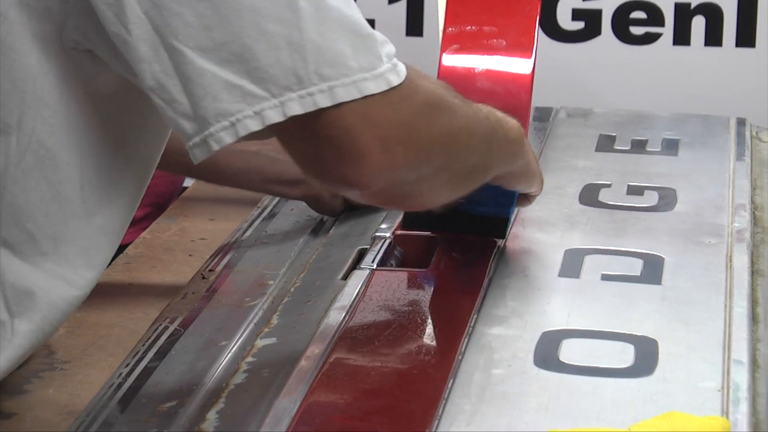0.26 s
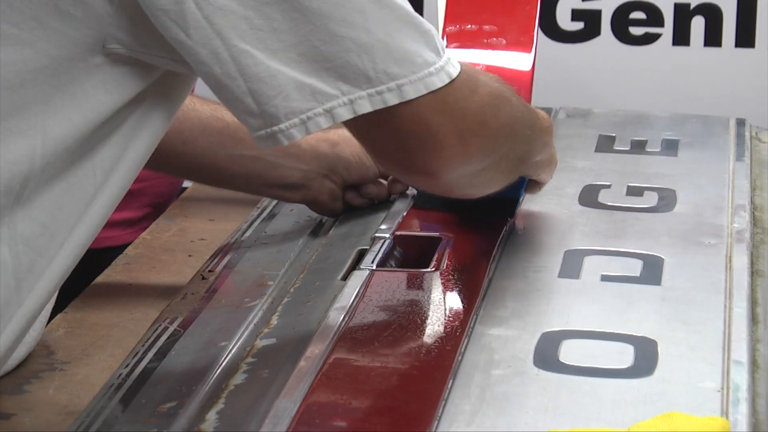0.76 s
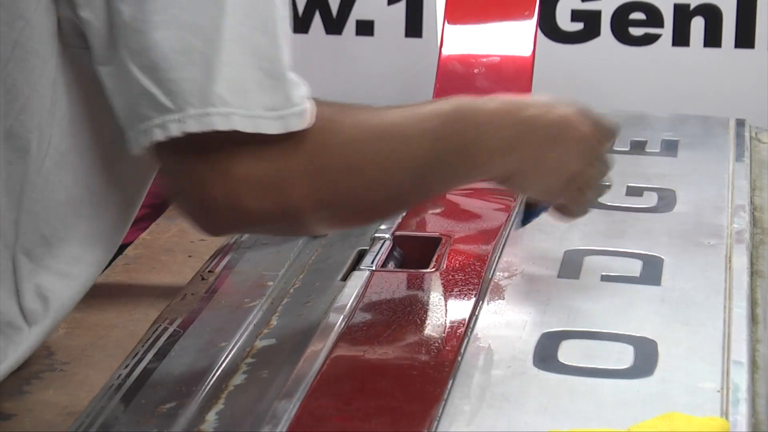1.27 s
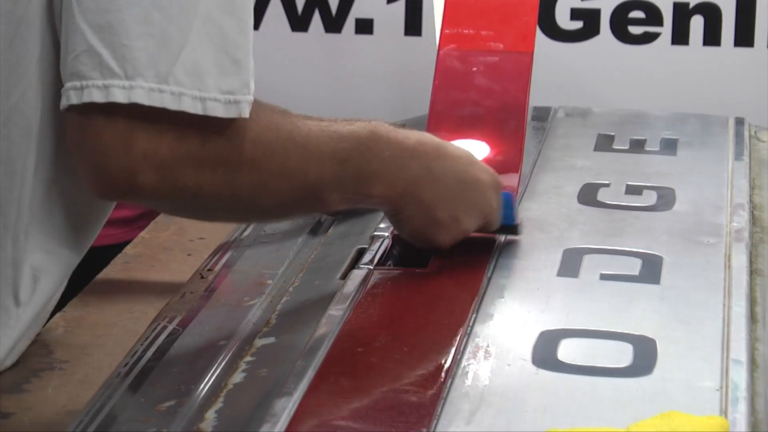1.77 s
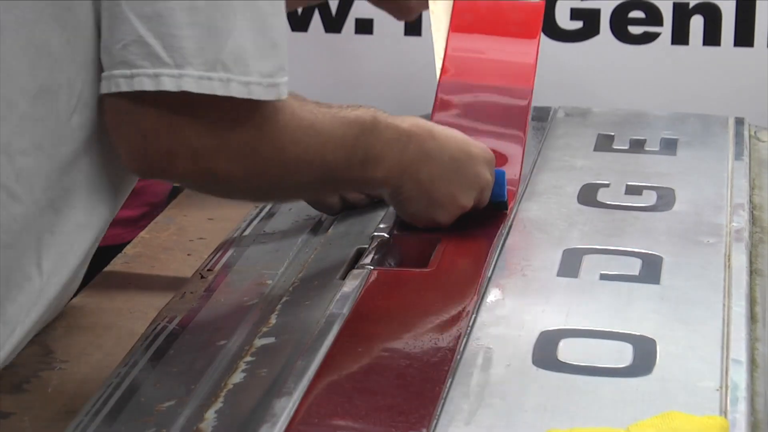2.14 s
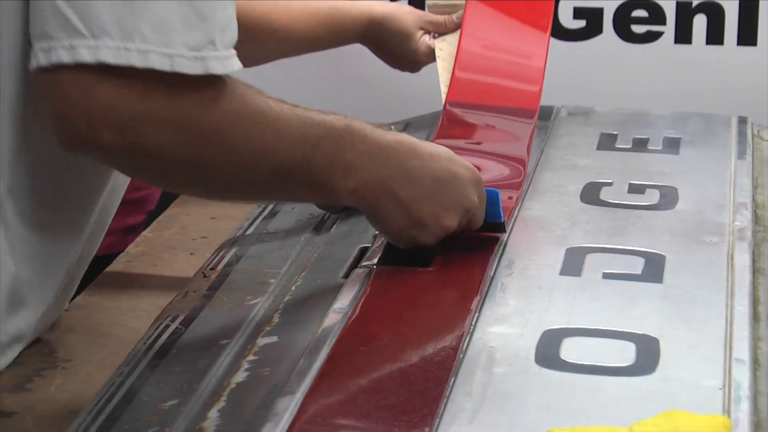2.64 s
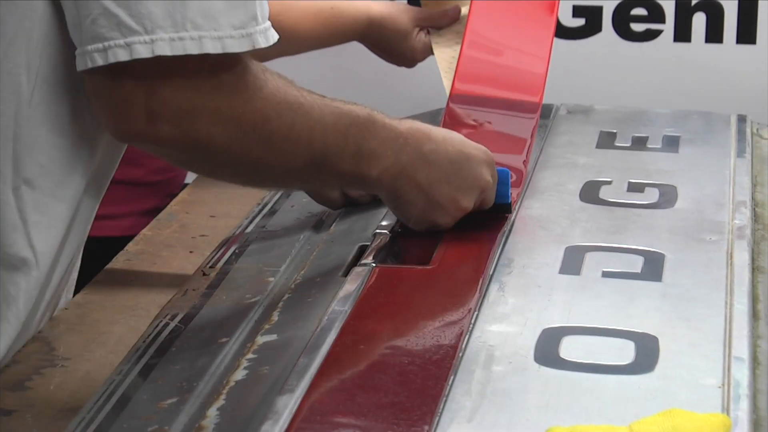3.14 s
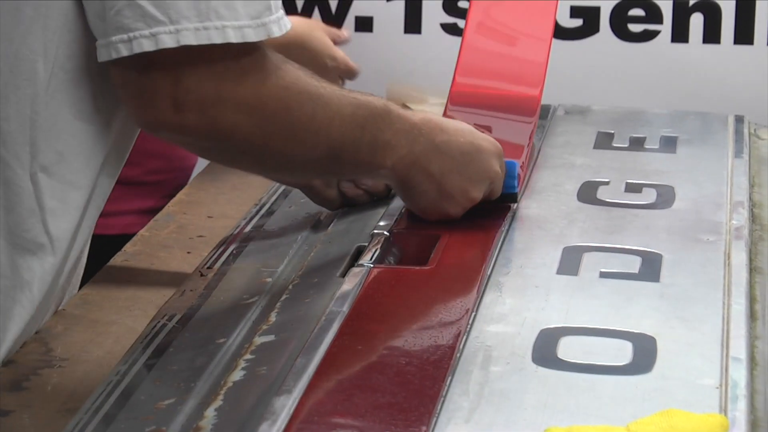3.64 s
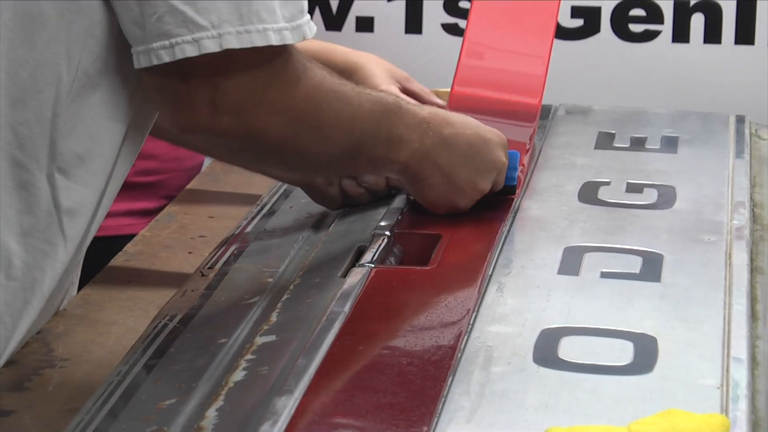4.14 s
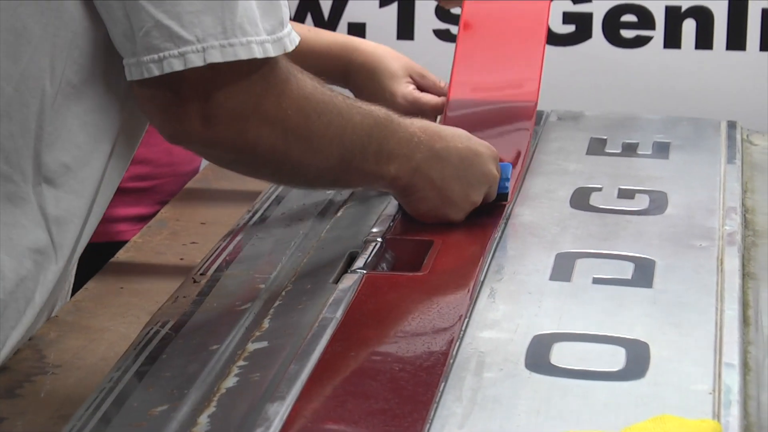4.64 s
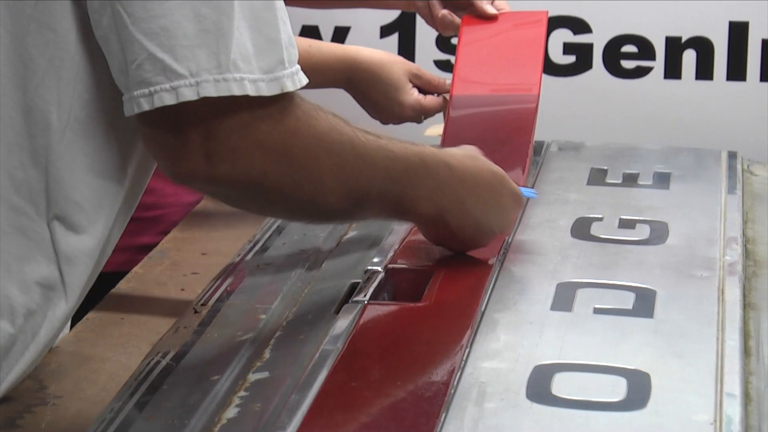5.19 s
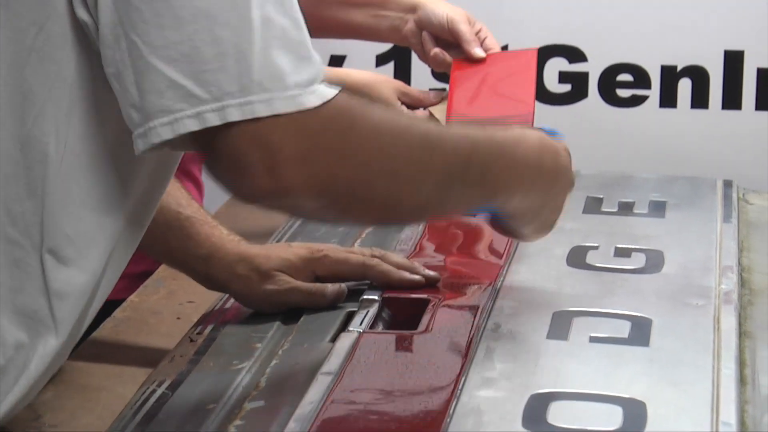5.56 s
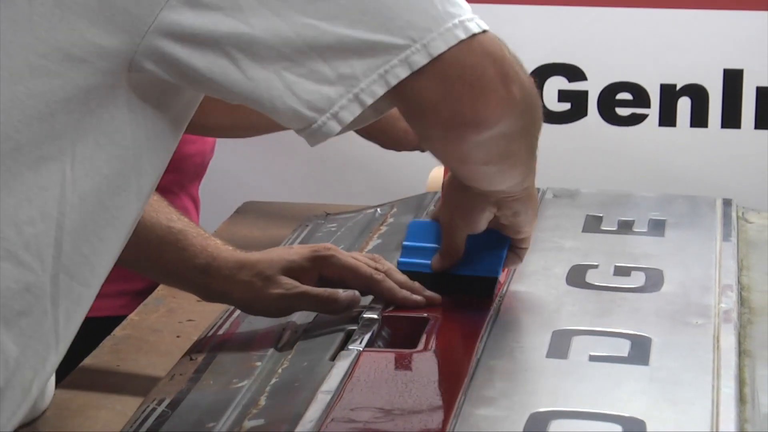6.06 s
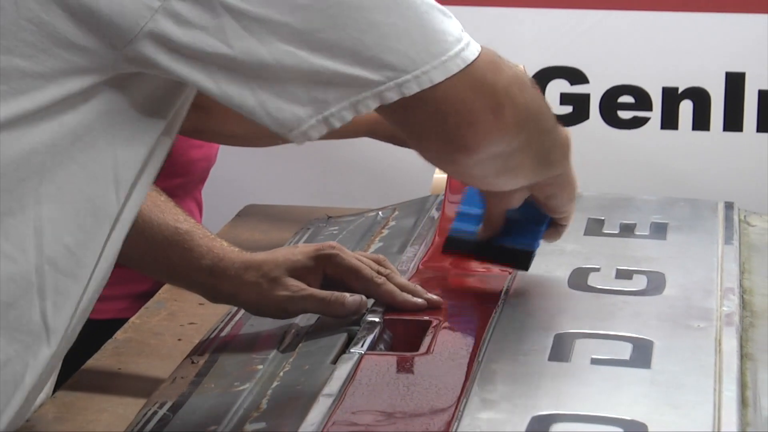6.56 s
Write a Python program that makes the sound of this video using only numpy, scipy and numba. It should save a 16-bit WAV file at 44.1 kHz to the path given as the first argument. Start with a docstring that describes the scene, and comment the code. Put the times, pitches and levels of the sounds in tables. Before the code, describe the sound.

A felt-edged plastic squeegee works wet vinyl onto a hollow metal tailgate, heard up close over low, steady garage air. A dull knock at 0.3 seconds and a faint rub lead to a short, low judder from about 0.7 to 1.1 seconds. Hissing, rasping strokes with soft bumps follow from 1.6 to 3 seconds. From about 3.1 to 3.7 seconds the blade is pressed hard and sticks and slips, drumming the panel loudly with sharp knocks and brief hollow squawks. A second loud judder comes around 4 to 4.3 seconds; the loudest peaks duck and clip slightly. Lighter scraping continues, with a sharp click near 4.9 seconds and a quieter stretch of small ticks. Rubbing returns around 5.7 seconds, with a firm knock at 6, then more uneven swipes, soft bumps and ticks, and a sharp click near 6.8 seconds.

```python
"""Squeegee on a hollow tailgate

A felt-edged plastic squeegee works wet vinyl onto a sheet-metal tailgate on a bench in a garage.
Gliding felt hisses; pressed hard it sticks and slips, drumming the hollow panel. The blade knocks,
clicks and snags over steady room air. A close camera microphone turns its gain down on the loud
strokes and clips their peaks."""
import sys
import numpy as np
from scipy import signal
from scipy.fft import rfft, irfft
from scipy.io import wavfile
from scipy.ndimage import uniform_filter1d
from numba import njit

SR = 44100
rng = np.random.default_rng(int(sys.argv[2]) if len(sys.argv) > 2 else 0)


def to_wav(s):
    """Save 16-bit WAV."""
    ch = np.atleast_2d(s).T  # columns
    pcm = np.round(np.clip(ch, -1, 1) * 32767)  # PCM
    wavfile.write(sys.argv[1], SR, pcm.astype(np.int16))


N = 300762
TIME = np.arange(N) / SR
RING_TIME = TIME[:SR * 3 // 5]  # the 0.6 s that one tap rings for
TOP_HZ = 15900

# tone of felt hissing on wet vinyl: (frequency [Hz], level [dB])
HISS_TONE = [(1500, -33), (3000, 0.5), (4300, 0.5), (5000, 0), (5900, -1.5), (7000, -4), (8300, -2.5),
             (10000, -3), (12500, -5.5), (16000, -9)]


def judders(spots, slip_hz=74, bare_hz=1000, jitter=0.0995, uneven_db=3, rebound_db=-7, crack_db=1.0):
    """Stick-slip: the felt grips and lets go, each slip tapping the panel as the blade creeps along."""
    # hard-pressed strokes: (start [s], hardest push [s], end [s], peak level [dB],
    # swell and fade [dB/s], peak hardness [Hz], low cut [Hz])
    hard_strokes = [(0.722, 0.91, 1.07, -14, 14, 155.1, 115), (2.212, 2.348, 2.35, -15.5, 89, 172, 69.5),
                    (3.099, 3.133, 3.12, -11, 150, 446, 60), (3.372, 3.56, 3.72, -0.5, 69, 1093, 81),
                    (3.965, 4.006, 4.05, -12.5, 150, 172.2, 42), (4.112, 4.148, 4.72, -3, 102, 1152, 65),
                    (6.32, 6.33, 6.726, -29.5, 14, 130, 125)]
    out = np.zeros(N)
    for start, peak, end, peak_db, db_per_s, peak_hz, low_hz in hard_strokes:
        timing, luck, lag = rng.standard_normal((96, 3)).T
        # the bare blade slips slip_hz times a second; a harder grip holds longer
        rate = slip_hz * (bare_hz / peak_hz) ** .3
        times = np.append(0, np.cumsum(np.abs(1 + jitter * timing))) / rate
        length = max(end - start, 1 / rate)
        here, there = (spots[k] for k in rng.permutation(len(spots))[:2])
        cracks = [undb(crack_db) * snap(peak_hz) for _ in range(4)]
        stroke, sizes = np.zeros(int(length * SR) + len(RING_TIME)), []
        for k, s in enumerate(times[times < length]):
            travel = s / length
            eased_db = db_per_s * abs(start + s - peak)
            firmness = .5 ** (eased_db / 13)  # a push 13 dB weaker is half as hard
            sizes.append(undb(peak_db - eased_db))
            spot = (1 - travel) * here + travel * there
            tap = boom(spot, firmness * peak_hz, low_hz) + firmness * cracks[k % len(cracks)]
            slip = sizes[-1] * undb(uneven_db * luck[k]) * tap
            add(stroke, s, slip)
            # a hard edge catches again, more weakly, part way to the next slip
            rebound = undb(rebound_db) * min(firmness * peak_hz / bare_hz, 1)
            add(stroke, s + abs(.5 + 0.151 * lag[k]) / rate, rebound * slip)
        # overlapping rings pile up, so the stroke as a whole is brought to its level
        piled_power = np.mean(stroke[:int(length * SR)] ** 2)
        add(out, start, stroke * np.sqrt(np.mean(np.square(sizes)) / piled_power))
    return out


def knocks_and_slips(spots, snap_db=-3):
    """Knocks and the loudest slips boom in the hollow panel, the hard ones with a snap on top."""
    # knocks of blade and hand, and the loudest slips of the juddering blade:
    # (time [s], level [dB], hardness [Hz], low cut [Hz])
    jolts = [(.290, -16.5, 284, 200), (.973, -14.5, 181, 59.5), (1.05, -18, 830, 165),
             (1.602, -27, 230, 101.4), (1.888, -24.5, 287, 104), (2.314, -13, 850, 110),
             (2.335, -10, 180, 50), (2.730, -14, 346, 222), (3.092, -10, 1440, 69.6),
             (3.222, -6, 2220, 69.5), (3.339, -3.5, 2550, 100), (3.359, -8, 2070, 98),
             (3.439, -9, 1800, 61.8), (3.486, -5, 2200, 102), (3.506, -6, 2180, 148),
             (3.940, -10.5, 1130, 100), (3.953, -10.5, 1310, 70), (4.099, -5.5, 2030, 60),
             (4.201, -8.5, 2170, 100), (4.241, -11, 1480, 189), (4.484, -19, 1100, 105),
             (5.511, -22.5, 240, 108), (5.987, -6, 950, 233), (6.141, -23, 344, 128),
             (6.301, -20.5, 185, 111), (6.579, -17, 271.3, 125)]
    # each jolt touches, lands, then settles: (delay [s], level offset [dB], share of hardness [ratio])
    touches = [(-.008, -13.5, .8), (0, 0.5, 1), (.03, -10.5, .6)]
    out = np.zeros(N)
    for s, db, hz, low_hz in jolts:
        for delay, offset_db, share in touches:
            spot = spots[rng.integers(len(spots))]
            tap = boom(spot, share * hz, low_hz) + undb(snap_db) * snap(share * hz)
            add(out, s + delay, undb(db + offset_db) * tap)
    return out


def panel_spots(count=8, spread_db=5.0, sheet_db=-1, direct_db=-3, garage_db=-11):
    """The panel's ring when tapped at several spots; each spot weights the modes differently."""
    # modes of the hollow panel: (frequency [Hz], level [dB], decay t60 [s])
    panel_modes = [(85.5, 1.5, 0.27), (110.2, 5, 0.26), (137.74, 0, 0.42), (172, 4, 0.25),
                   (195.7, -0.5, 0.24), (284, -8.5, 0.28), (311.4, -1, 0.23), (353, -9.5, 0.065),
                   (394, -8.5, 0.56), (475.4, 0.5, 0.2), (516.5, -3.5, 0.13), (599, -14, 0.18),
                   (613, -12, 0.27), (780, -13, 0.49), (902, -6, 0.14), (1015, 0.5, 0.1), (1061, -9, 0.28),
                   (1222, -12.5, 0.11), (1350, -12, 0.23), (1440, -8.5, 0.19), (1660, -24, 0.22)]
    # tone of the sheet's crowded modes: (frequency [Hz], level [dB])
    sheet_tone = [(30, -39.5), (58, -29), (100, 7.5), (170, -2), (240, -3.5), (480, 3.5), (750, -3.5),
                  (1020, -8), (1250, -8.5), (1550, -9), (2200, -14), (4000, -24.5), (8000, -17.5),
                  (16000, -49)]
    modes = np.array([(-1) ** (k // 3) * undb(db) * np.sin(2 * np.pi * hz * RING_TIME) * fade(t60)
                      for k, (hz, db, t60) in enumerate(panel_modes)])
    spots = []
    for _ in range(count):
        wash = scatter(t60=0.21) + undb(garage_db) * scatter(t60=0.88)
        wash[0] += undb(direct_db)
        weights = undb(spread_db * rng.standard_normal(len(modes)))
        spots.append(unit(weights @ modes) + undb(sheet_db) * unit(colour(wash, sheet_tone)))
    return spots


def boom(spot, hardness_hz, low_hz):
    """One contact rings the panel: hand and felt each dull it; stiff spots near a fold lack bass."""
    through_hand = soften(spot, hardness_hz)
    through_felt = soften(through_hand, 1.75 * hardness_hz, order=2)
    return at_level(soften(through_felt, low_hz, order=2, side="high"), 0, size=880)


def snap(hardness_hz, full_hz=1500):
    """The brief crack of the blade letting go; a soft contact has almost none."""
    crack = scatter(t60=.006) + undb(-8) * scatter(t60=.07)
    crack = colour(crack, [(500, -23), (2000, 13), (5500, -1), (9000, -9.5), (16000, -23.0)])
    return at_level(crack, -15) * min(hardness_hz / full_hz, 1) ** 2


def clicks(rattle_t60=0.076, garage_t60=0.36, garage_db=-6):
    """The plastic edge ticks on the sheet and the garage answers."""
    # ticks of the hard edge: (time [s], level [dB], pitch [Hz])
    edge_ticks = [(1.050, -28.5, 4160), (1.294, -37, 1770), (2.906, -29.5, 9350), (2.965, -35, 5000),
                  (3.082, -23, 6200), (3.221, -22, 4860), (3.750, -23.5, 2760), (4.484, -23.5, 2650),
                  (4.853, -13, 2870), (5.071, -32, 2980), (5.224, -19, 890), (5.560, -31.5, 500),
                  (6.192, -33.5, 1490), (6.356, -29.5, 2280), (6.487, -30, 3080), (6.520, -21, 1414),
                  (6.541, -24, 1360), (6.742, -27, 1280), (6.792, -13.5, 5540)]
    # tone of the blade ringing on the sheet: (frequency [Hz], level [dB])
    blade_tone = [(60, -30), (300, 8), (550, 8), (800, 7), (1100, 3.5), (1450, 8.5), (1750, -1), (2150, -1),
                  (2600, -10), (3100, -6), (4000, -9), (7000, -14), (11000, -15.5), (16000, -35)]
    out = np.zeros(N)
    for s, db, hz in edge_ticks:
        edge = undb(-3) * scatter(t60=.008)
        tick = edge + scatter(rattle_t60) + undb(garage_db) * scatter(garage_t60)
        tick = colour(colour(tick, blade_tone), [(hz / 10, -17), (hz, 0), (hz * 10, -10)])
        add(out, s, at_level(tick, db))
    return out


def catches(width_hz=320, t60=0.22):
    """A blade that snags shivers for a moment with a short hollow squawk."""
    # snags that set the plastic flexing: (time [s], level [dB], pitch [Hz])
    snags = [(0.837, -26.5, 1040), (3.090, -20.5, 1100), (3.226, -14, 1060), (3.347, -16, 980)]
    out = np.zeros(N)
    for s, db, hz in snags:
        flex = signal.butter(2, [hz - width_hz / 2, hz + width_hz / 2], "band", fs=SR, output="sos")
        add(out, s, at_level(signal.sosfilt(flex, scatter(t60)), db, size=1500))
    return out


def glide(spot, rasp_boost_db=2, ring_db=-5, ring_hz=1100, speed_power=0.95, flutter_db=1):
    """Felt on wet vinyl hisses and rasps, louder with speed, and rings the sheet's upper modes."""
    # tone of the felt's rasp on the sheet: (frequency [Hz], level [dB])
    rasp_tone = [(100, -2.5), (330, -1), (500, 7), (800, -2.5), (1200, 1.5), (1500, -0.5), (1800, -1),
                 (2150, -3), (2600, -4), (3100, -4.5), (4000, -25), (8000, -34)]
    # gliding strokes: (start [s], fastest [s], end [s], hiss level [dB], rasp level before boost [dB],
    # hiss centre [Hz], rasp centre [Hz])
    strokes = [(0.384, 0.59, 0.74, -45, -51, 3980, 1000), (1.607, 1.675, 1.91, -43.5, -45.5, 11000, 1200),
               (1.84, 2.24, 2.47, -36, -34, 6020, 990), (2.55, 2.563, 2.78, -36, -29, 4520, 1610),
               (2.674, 2.996, 3.21, -38.5, -36, 8850, 1710), (3.187, 3.757, 3.94, -46, -34.5, 5000, 1500),
               (3.9, 4.11, 4.08, -40, -36.5, 6000, 1300), (4.394, 4.493, 4.56, -36.5, -36.5, 7500, 1397),
               (4.51, 4.628, 4.83, -34, -33, 5500, 1930), (4.71, 4.832, 4.95, -31.5, -31.5, 3000, 2800),
               (4.846, 4.977, 5.48, -51.5, -36.5, 5000, 2400), (5.46, 5.52, 5.84, -48, -49.5, 9000, 1000),
               (5.703, 5.836, 6.01, -34, -32, 8850, 1110), (5.96, 6.08, 6.24, -43, -40, 6000, 1300),
               (6.265, 6.355, 6.453, -35.5, -38.5, 7500, 1390), (6.4, 6.496, 6.48, -35, -38, 14000, 1400),
               (6.45, 6.572, 7.24, -44, -37, 5070, 1400)]
    hiss = friction(HISS_TONE, grain_db=1.3) + undb(-9.5) * crackle()
    scrape = friction(rasp_tone, grain_db=1.15)
    upper_modes = soften(spot, ring_hz, order=2, side="high")
    rasp = scrape + undb(ring_db) * unit(signal.fftconvolve(scrape, upper_modes)[:N])
    pushes = [(np.interp(TIME, [start, fastest, end], [0, 1, 0]) ** speed_power, *tone)
              for start, fastest, end, *tone in strokes]
    pushes.append((skids(), -42.5, -44, 4530, 990))  # levels and centres as for a stroke
    rub = undb(-60.5) * hiss + undb(-53) * rasp  # felt and film never lie quite still
    for push, hiss_db, rasp_db, hiss_hz, rasp_hz in pushes:
        on = push > 0
        stroke_hiss = undb(hiss_db) * lean(hiss[on], hiss_hz, skirt_db=-5)
        stroke_rasp = undb(rasp_db + rasp_boost_db) * lean(rasp[on], rasp_hz, skirt_db=-3.5)
        rub[on] += push[on] * (stroke_hiss + stroke_rasp)
    return rub * undb(flutter_db * walk(60))


def friction(tone, grain_db, shift_db=2, bands=14):
    """Countless fibres catch in tiny grains; the colour shifts as the blade tilts and travels."""
    noise = rng.standard_normal(N)
    grain_sizes = np.repeat(rng.exponential(size=N // 24 + 1), 24)[:N]
    spectrum = rfft(colour(noise * undb(grain_db * grain_sizes), tone))
    log_hz = np.log(np.arange(len(spectrum)) * SR / N + 1)
    centres = np.linspace(np.log(500), np.log(TOP_HZ), bands)
    layers = (irfft(spectrum * np.interp(log_hz, centres, band), N) for band in np.eye(bands))
    return unit(sum(layer * undb(shift_db * walk(7)) for layer in layers))


def skids(count=5, start_s=.73, every_s=.06, length_s=0.048):
    """Grip envelope of the felt hopping in a row of even skids."""
    grip = np.zeros(N)
    for k in range(count):
        add(grip, start_s + k * every_s, signal.windows.tukey(int(length_s * SR), .2))
    return grip


def crackle(per_s=45, spread_db=6):
    """Tiny bubbles and grit tick under the felt."""
    ticks = (rng.random(N) < per_s / SR) * undb(spread_db * rng.standard_normal(N))
    return unit(colour(signal.fftconvolve(ticks, scatter(t60=0.014))[:N], HISS_TONE))


def garage(level_db=-35, drift_db=0.39):
    """Room tone: a low, steady bed of air noise."""
    # tone of the garage air: (frequency [Hz], level [dB])
    air_tone = [(15, -45), (28, -12), (55, -13.5), (88, 0.5), (150, -2), (250, -7.5), (400, -14),
                (650, -15.5), (1150, -13.5), (1900, -26), (3000, -33), (6000, -35), (10000, -35.5),
                (16000, -40.5)]
    return unit(colour(rng.standard_normal(N), air_tone)) * undb(level_db + drift_db * walk(5.77))


def undb(db):
    """Decibels to gain."""
    return 10 ** (np.asarray(db) / 20)


def unit(x):
    """Scale to rms 1."""
    return x / np.sqrt(np.mean(x ** 2) + 1e-18)


def at_level(x, db, size=660):
    """Set the rms level of the attack, the first size samples."""
    return x * undb(db) / np.sqrt(np.mean(x[:size] ** 2))


def add(out, s, x):
    """Mix x into out from time s."""
    i = max(int(s * SR), 0)
    out[i:i + len(x)] += x[:max(len(out) - i, 0)]


def colour(x, points, size=4096):
    """Minimum-phase EQ through (frequency [Hz], level [dB]) points."""
    hz, db = np.transpose(points)
    log_hz = np.log(np.arange(size // 2 + 1) * SR / size + 1)
    gain = undb(np.interp(log_hz, np.log(hz), db))
    cepstrum = irfft(np.log(gain))
    cepstrum[1:size // 2] *= 2
    cepstrum[size // 2 + 1:] = 0
    return signal.fftconvolve(x, irfft(np.exp(rfft(cepstrum))))[:len(x)]


def lean(x, hz, skirt_db):
    """Broad EQ peak at hz, falling to skirt_db two octaves either side; rms 1."""
    return unit(colour(x, [(hz / 4, skirt_db), (hz, 0), (hz * 4, skirt_db)], size=512))


def soften(x, hz, order=1, side="low"):
    """Gentle low-pass (or high-pass) at hz."""
    return signal.sosfilt(signal.butter(order, min(hz, SR / 3), side, fs=SR, output="sos"), x)


def walk(rate_hz):
    """Smooth random drift with rms 1."""
    hold = int(SR / rate_hz)
    steps = np.repeat(rng.standard_normal(N // hold + 1), hold)
    return unit(uniform_filter1d(uniform_filter1d(steps, hold), hold)[:N])


def fade(t60):
    """Exponential decay, 60 dB in t60 seconds."""
    return np.exp(-np.log(1000) * RING_TIME / t60)


def scatter(t60):
    """A decaying cloud of reflections with energy 1."""
    cloud = rng.standard_normal(len(RING_TIME)) * fade(t60)
    return cloud / np.linalg.norm(cloud)


@njit
def follow(x, attack, release):
    """Envelope follower with separate rates for rising and sinking."""
    out, level = np.empty(len(x)), 0.
    for i in range(len(x)):
        level += (abs(x[i]) - level) * (attack if abs(x[i]) > level else release)
        out[i] = level
    return out


def scene():
    """Squeegee, panel and room at one microphone."""
    spots = panel_spots()
    drumming = knocks_and_slips(spots) + judders(spots)
    return (drumming + clicks() + glide(spots[0]) + garage() + catches())[None]


def record(dry, knee_db=-5, attack_s=0.0094, release_s=0.25):
    """Gain control ducks the loud strokes, the converter clips what slips through, the top is cut."""
    envelope = follow(dry[0], 1 / (attack_s * SR), 1 / (release_s * SR))
    ducked = dry / np.maximum(envelope / undb(knee_db), 1)
    top_cut = signal.ellip(10, .1, 80, TOP_HZ, fs=SR, output="sos")
    return signal.sosfilt(top_cut, np.clip(ducked, -1, 1))


dry = scene()
out = record(dry)
to_wav(out)
```